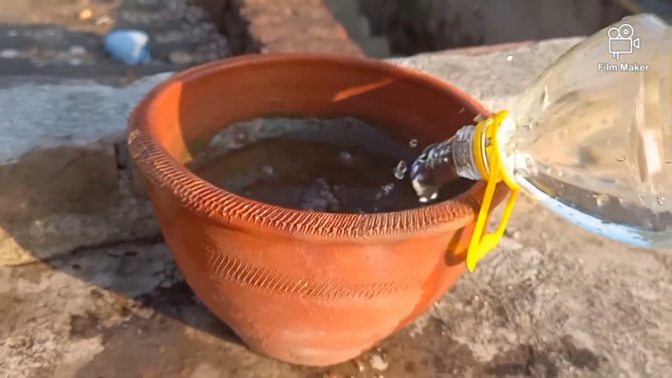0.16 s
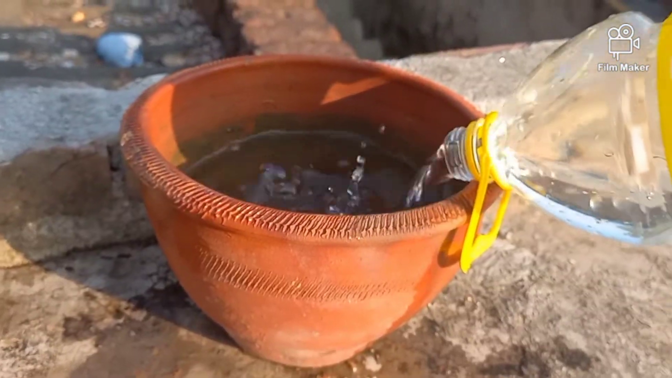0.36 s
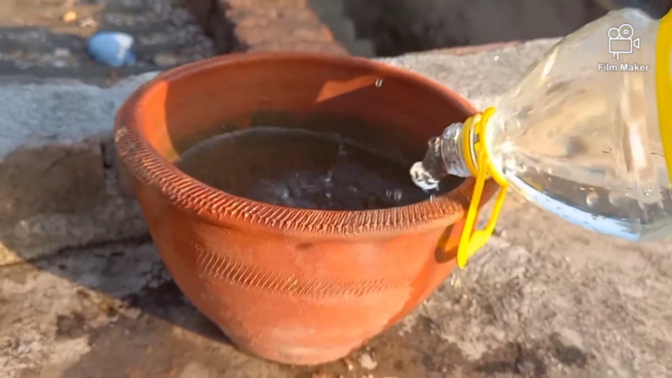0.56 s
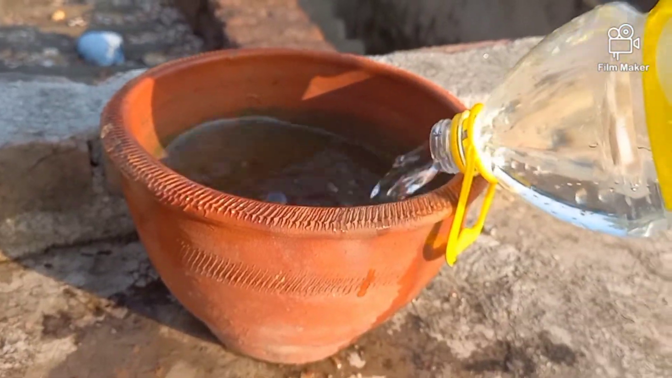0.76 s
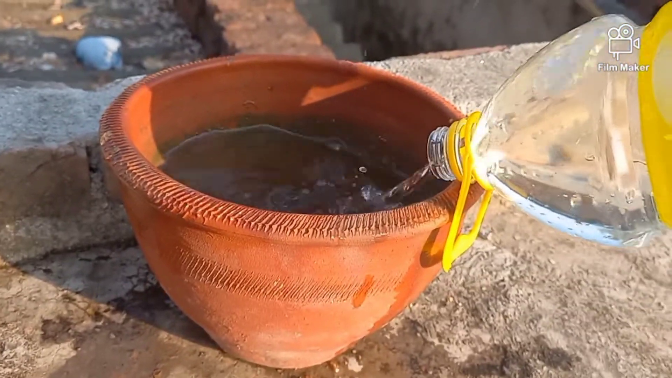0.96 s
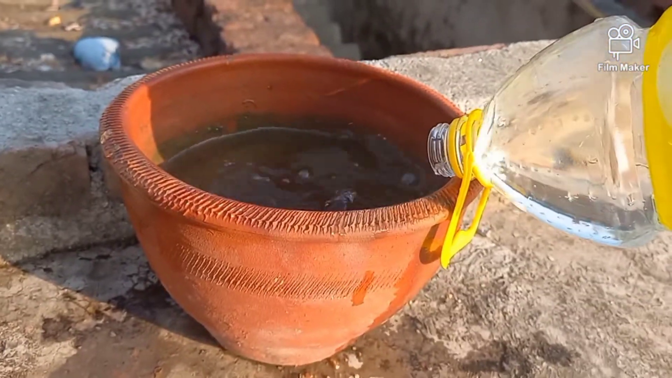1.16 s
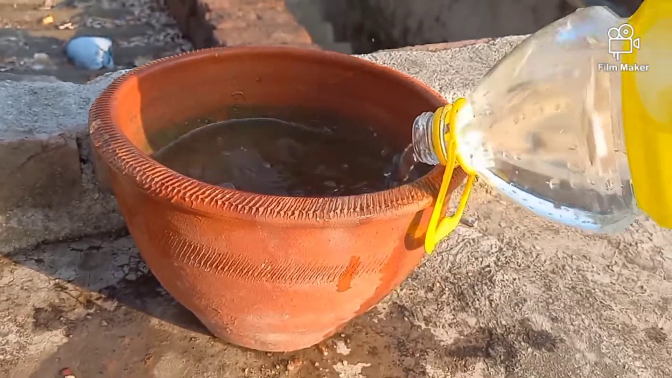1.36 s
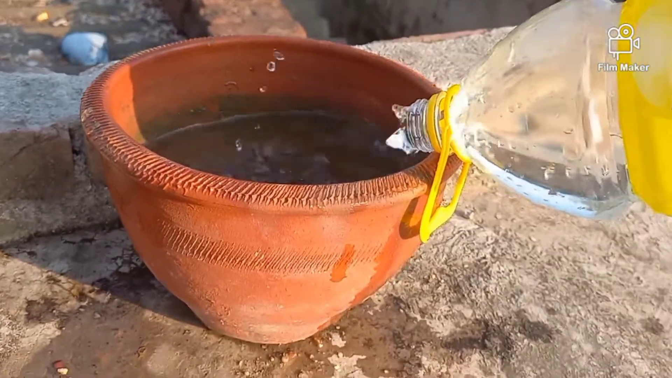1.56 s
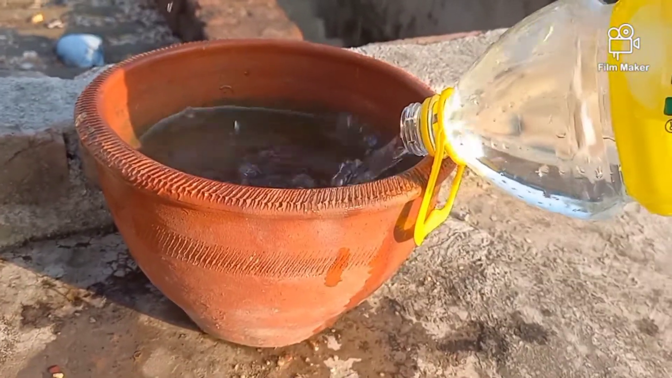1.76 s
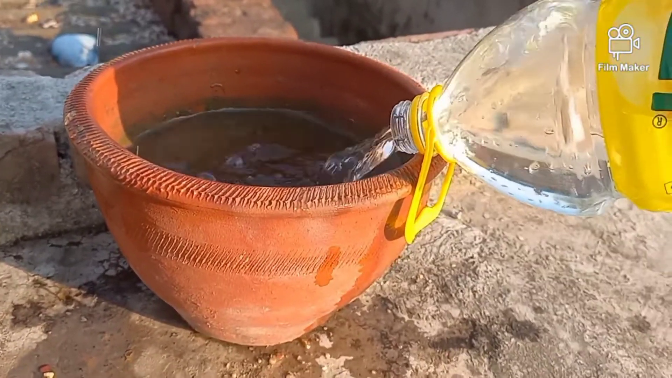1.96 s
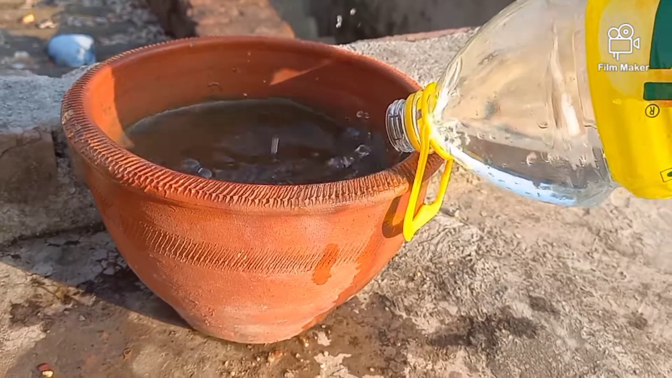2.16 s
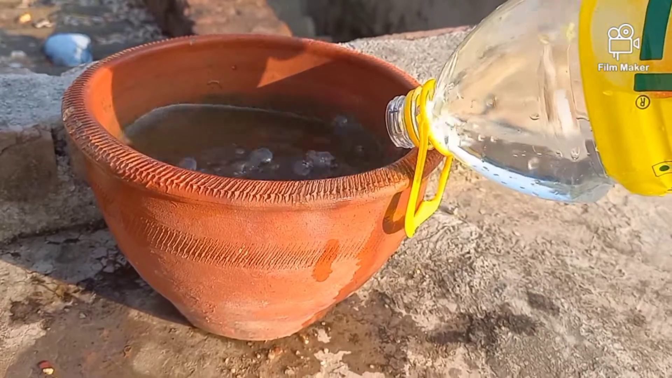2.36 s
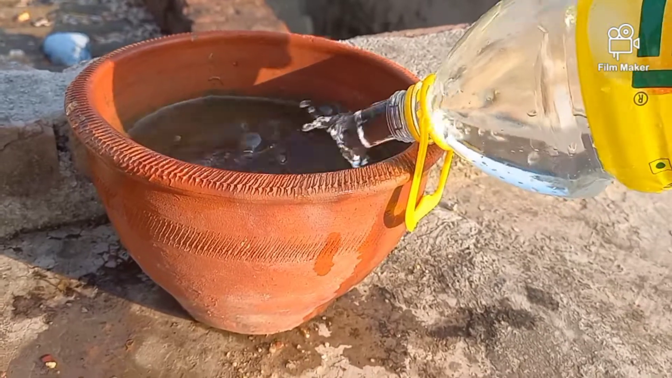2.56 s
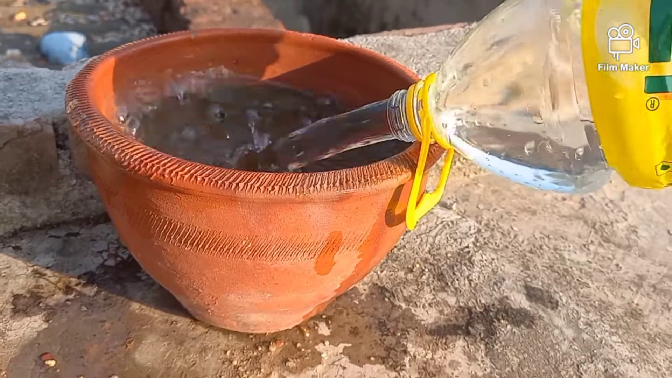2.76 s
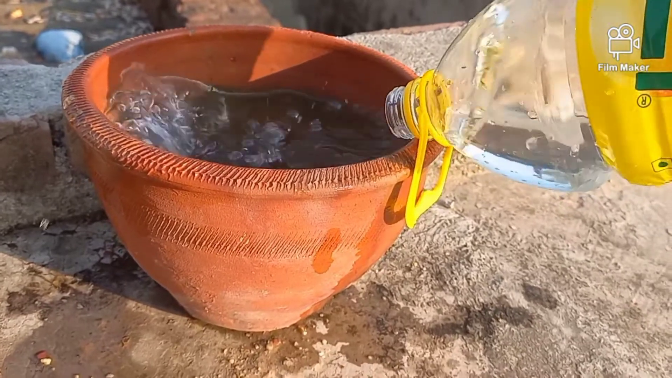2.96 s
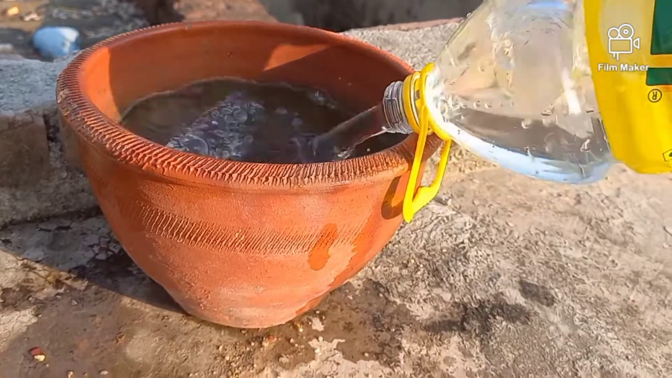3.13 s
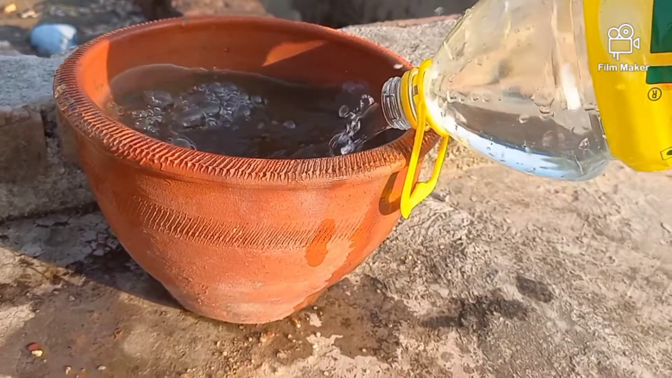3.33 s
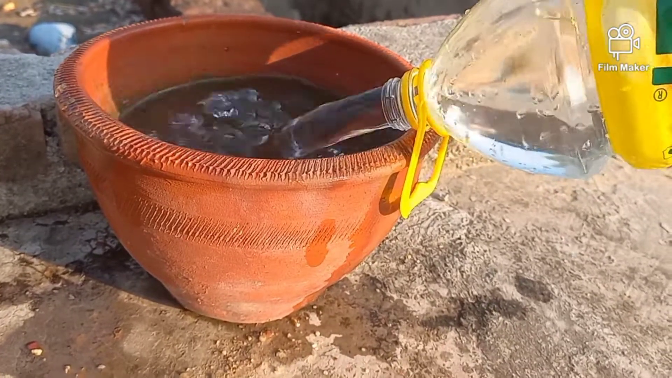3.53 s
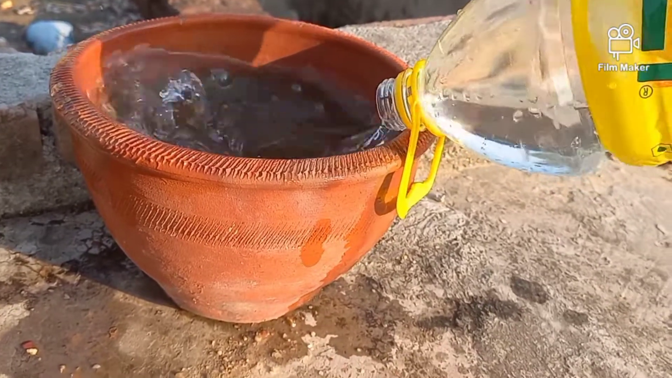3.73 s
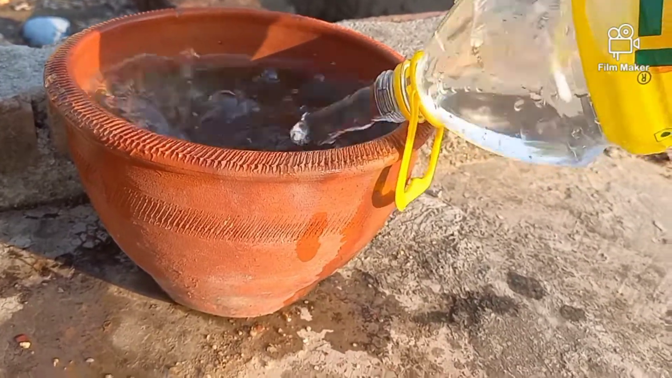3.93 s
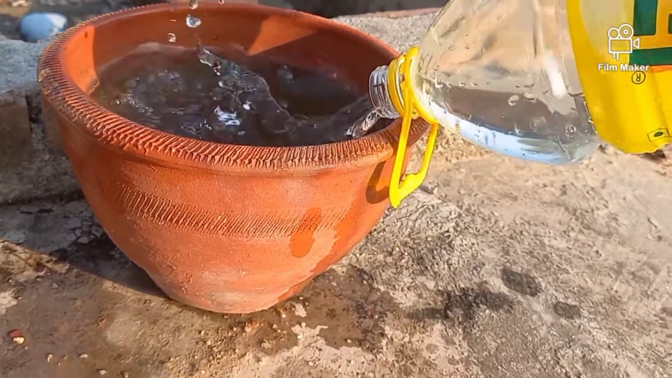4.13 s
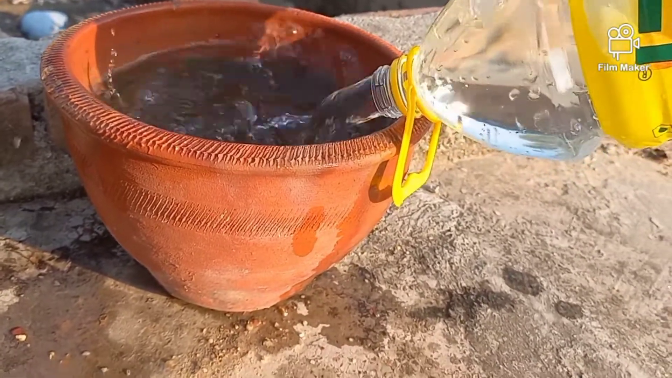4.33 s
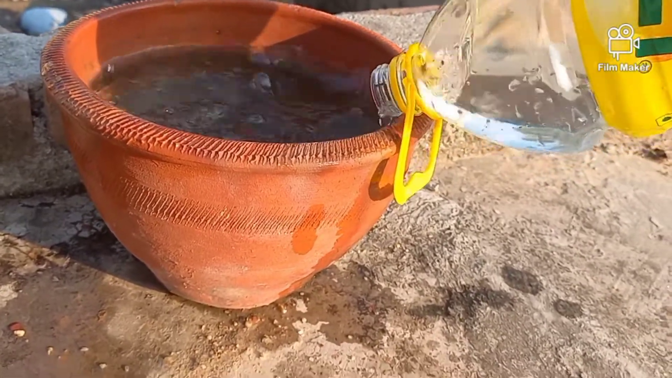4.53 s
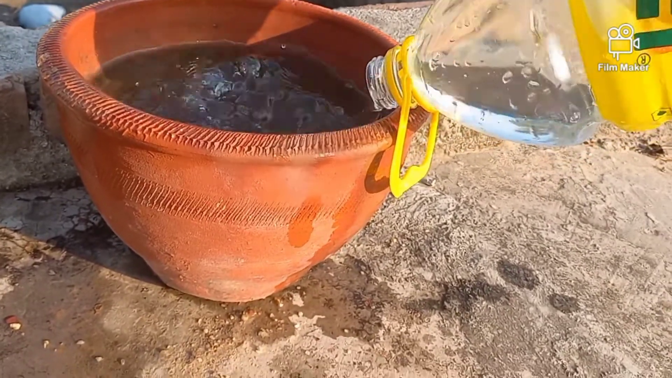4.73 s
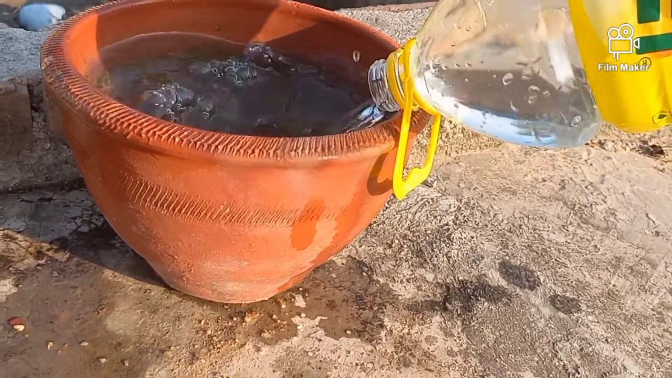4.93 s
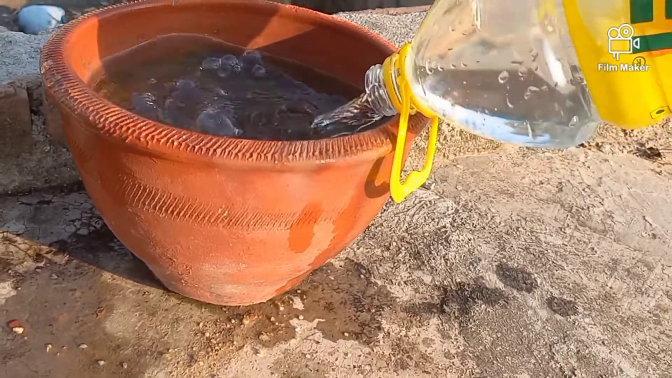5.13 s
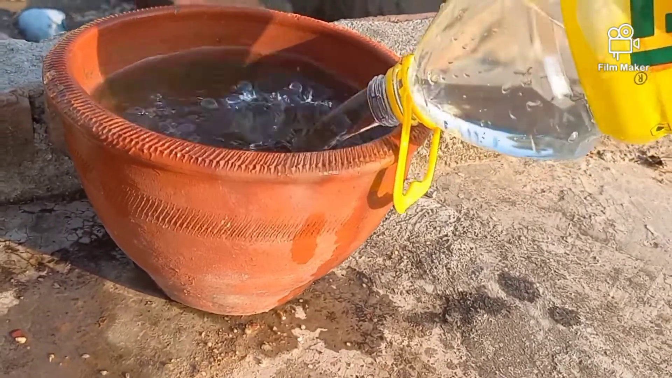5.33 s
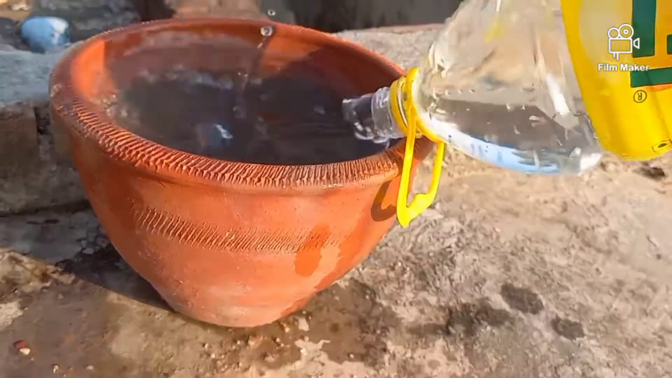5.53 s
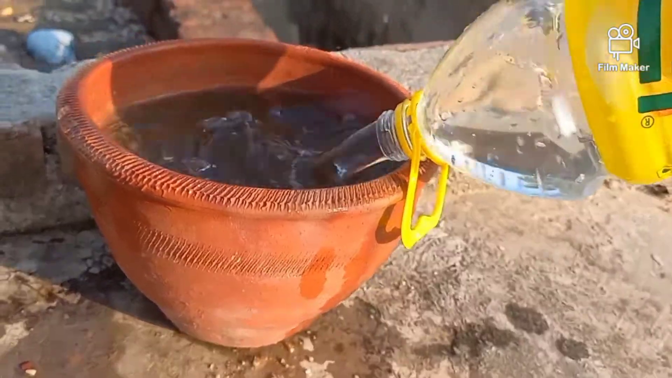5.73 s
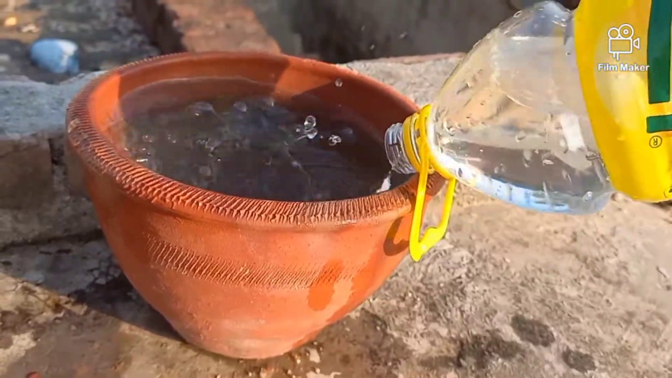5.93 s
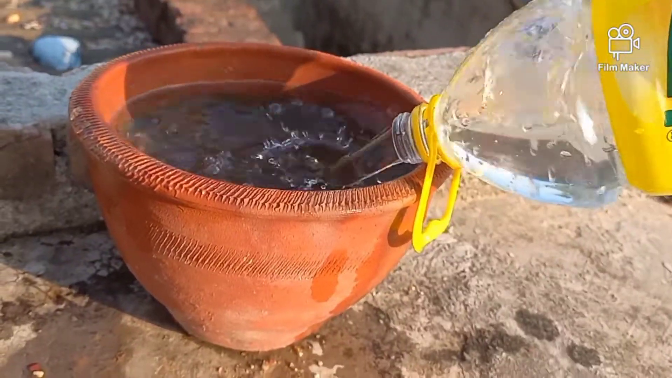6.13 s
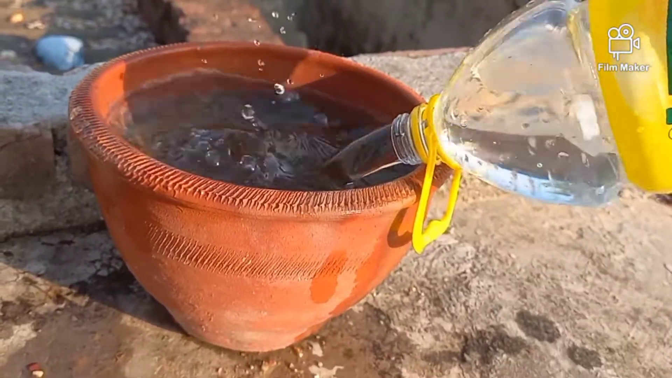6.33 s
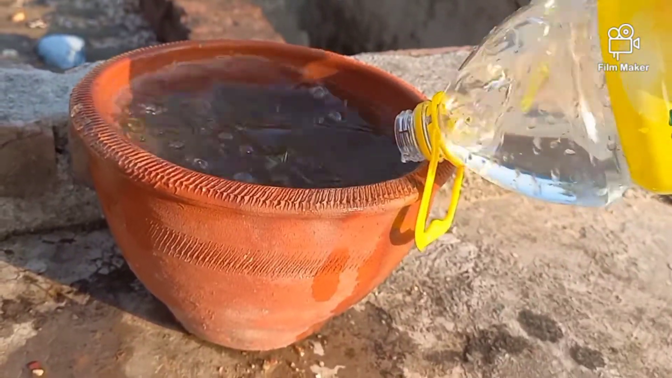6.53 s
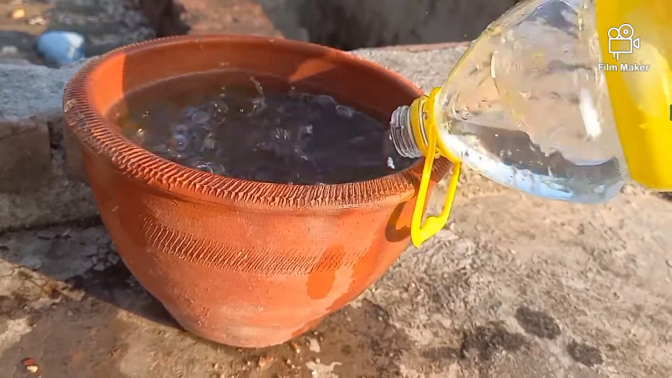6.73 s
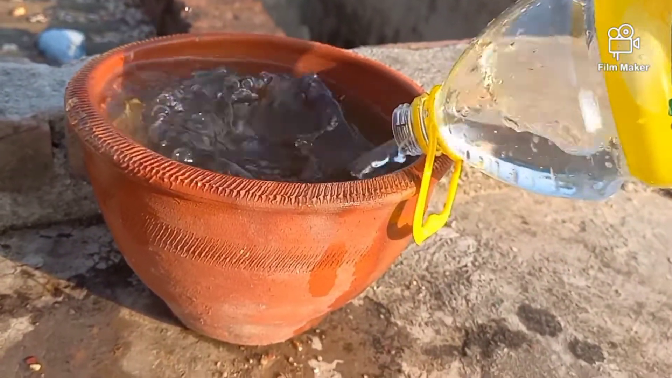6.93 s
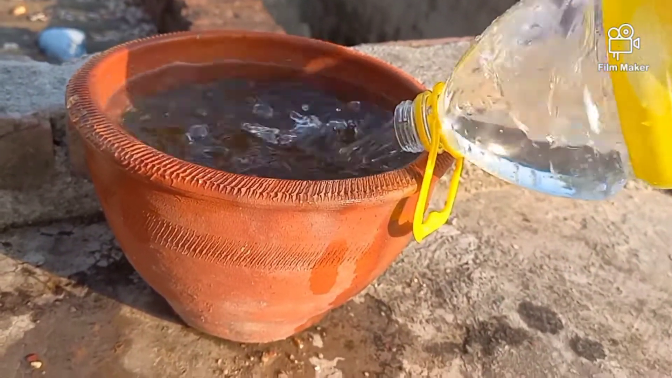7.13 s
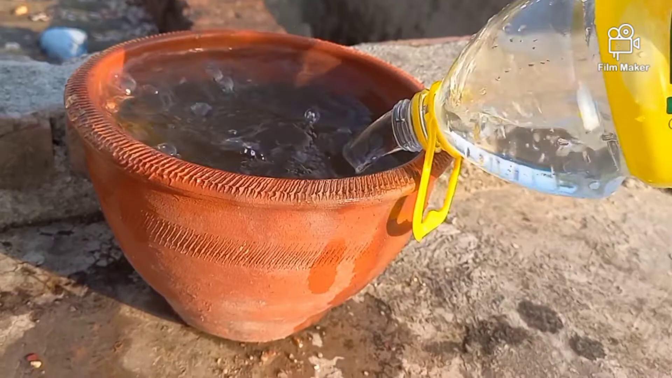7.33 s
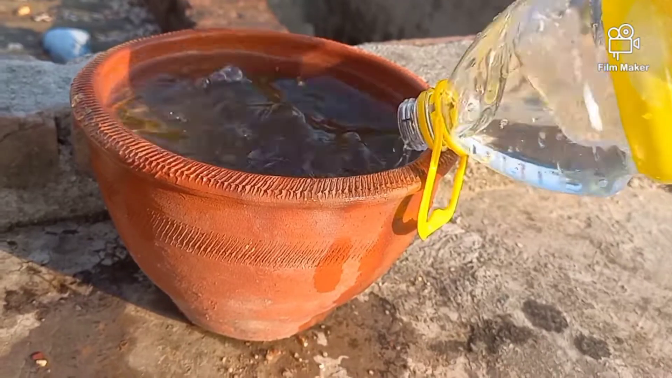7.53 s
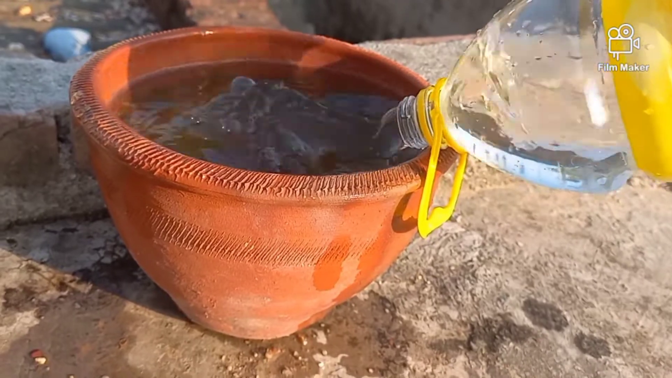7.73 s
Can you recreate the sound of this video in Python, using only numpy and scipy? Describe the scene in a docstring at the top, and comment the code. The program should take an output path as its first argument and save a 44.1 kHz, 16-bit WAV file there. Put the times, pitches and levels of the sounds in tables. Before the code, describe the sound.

Outdoors, close up, water leaves a large plastic bottle for a half-full clay bowl. From 0 to 2.5 s it only dribbles: small wet slaps, droplet patter and single round bubble plops, some low and hollow, some higher, with quieter gaps. At about 2.6 s the thin bottle wall begins to crackle and buckle, and from 2.7 to 3.1 s a strong gulp lands with low thumps, heavy splashing and a loud low bubble note. Another crack comes near 3.6 s and a big thumping splash at 3.8 s. Smaller glugs run through 4.3 to 5.6 s, with slosh and fizzing froth. Sharp plastic snaps stand out around 5.9, 6.35, 6.9 and 7.5 s among bubbling gulps and splashes, then a thinning wash. Faint low outdoor air and a short, faint yard reflection stay behind.

```python
"""Water is poured from a big plastic bottle into a half-full clay bowl, outdoors and close by.
It dribbles at first, each slap a patter of droplets and each trapped air pocket a damped ringing tone.
Then it comes in gulps: the thin wall buckles with cracks, and wall and plunging water thump low.
Each gulp stirs swarms of tiny bubbles into slosh, froth and spray, and leaves an afterwash.
The bowl's resonances colour the blows; a faint yard tail and outdoor air lie behind throughout."""
import sys
import numpy as np
from scipy import signal
from scipy.fft import rfft, irfft, next_fast_len
from scipy.io import wavfile
from scipy.ndimage import uniform_filter1d, map_coordinates

SR = 44100
rng = np.random.default_rng(int(sys.argv[2]) if len(sys.argv) > 2 else 0)


def master(y):
    """Save y as 16-bit WAV."""
    cut = np.clip(np.atleast_2d(y).T, -1, 1)
    pcm = np.round(cut * 32767)  # scale
    wavfile.write(sys.argv[1], SR, pcm.astype(np.int16))


N = 343098
BURST_TIME = np.arange(SR // 4) / SR  # s

# All levels in the tables are relative.
# Spectrum of the outdoor air: f/Hz, level/dB
AIR_SPECTRUM = [(12, -42), (20, -33), (77, 4), (127, 2.5), (198, -3), (434, -6), (660, -18), (849, -17),
                (1190, -25.5), (1610, -18), (2530, -26.5), (6180, -34), (8180, -41), (12400, -29.5),
                (16000, -34)]
# Left-right likeness of the outdoor air: f/Hz, likeness (0 to 1)
AIR_LIKENESS = [(30, 0.61), (120, 1), (400, 0.32), (1500, 0.15), (4000, 0.02)]
# Decay of the yard's tail: f/Hz, t60/s
YARD_DECAY = [(150, 0.33), (1500, 0.27), (12000, 0.18)]
# Spectrum of the churning water: f/Hz, level/dB
WATER_SPECTRUM = [(47, -22), (80, 6), (130, 3.5), (170, -4), (296, -7.5), (378, 3), (563, -7.5), (820, -6),
                  (1170, -21.5), (1560, -13), (2330, -22.5), (3470, -24.5), (6310, -27), (8050, -35),
                  (16000, -32)]
# The water between gulps never quite settles: t/s, level/dB
TRICKLE_LEVEL = [(0.0, -46.5), (0.37, -58.5), (0.69, -72.5), (1.41, -52.5), (1.62, -71), (2.51, -54.5),
                 (2.79, -42), (2.88, -38), (3.07, -52), (3.44, -53), (3.73, -37.5), (4.14, -57.5),
                 (4.53, -56.5), (5.48, -63), (6.52, -48.5), (6.61, -66), (6.76, -44.5), (7.78, -65)]
# Dribbles and gulps that churn the bowl: t/s (full level reached), hold/s, level/dB, frothiness/dB
GULP_EVENTS = [(0.037, 0.051, -41, -5.5), (0.124, 0.15, -42.5, -9.5), (0.496, 0.0067, -42.5, 9),
               (0.752, 0.037, -48.5, 1.5), (0.92, 0.084, -43.5, -1), (1.19, 0.072, -56, 9),
               (1.545, 0.083, -50.5, 1), (1.781, 0.0097, -45, -12), (1.928, 0.099, -45.5, -3.5),
               (2.123, 0.15, -44.5, -4.5), (2.408, .05, -47, 0), (2.615, 0.0078, -31, 2),
               (2.729, 0.038, -36, 1), (2.887, 0.013, -25, -18), (2.963, 0.1, -30.5, -10.5),
               (3.02, 0.024, -20.5, -4), (3.158, 0.035, -36, -20), (3.499, 0.0083, -37, 3.5),
               (3.586, 0.1, -37, -3.5), (3.828, .025, -21, -0.5), (3.904, 0.066, -38.5, -9),
               (4.359, 0.022, -42.5, -2.5), (4.548, 0.088, -33, -8), (4.843, 0.023, -41, -0.5),
               (5.042, 0.072, -29.5, -3), (5.311, .02, -40.5, 1.5), (5.486, 0.084, -28.5, -6.5),
               (5.747, 0.017, -39, -1.5), (5.907, 0.039, -39.5, -1.5), (6.045, 0.036, -28.5, -4.5),
               (6.285, 0.093, -46, 2), (6.527, 0.062, -25.5, -1.5), (6.892, .03, -38.5, 5),
               (7.043, 0.043, -33.5, 2), (7.266, 0.092, -49, -5.5), (7.475, 0.026, -39, 2),
               (7.588, 0.0077, -34, -13)]
# Bubble swarms: rate/(grains per s), lowest f/Hz, highest f/Hz, typical t60/cycles,
# fractional pitch rise over t60, size scatter/dB
SLOSH_SWARM = (200, 110, 650, 5.5, .15, 3.5)
FROTH_SWARM = (900, 650, 3500, 7, .1, 4.5)
SPRAY_SWARM = (1800, 3000, 16000, 9, .1, 5)
CHIRP_SWARM = (260, 600, 4200, 30, .25, 3.5)
DROPLET_SWARM = (3500, 1100, 16000, 9, .15, 4)
PLINK_SWARM = (70, 900, 4500, 45, .2, 4)  # drops falling back between gulps
# Single ringing bubbles: t/s, initial f/Hz, level/dB
BUBBLE_EVENTS = [(.0125, 1550, -22.5), (.0215, 345, -25), (.203, 1484, -39), (.219, 737, -39),
                 (.347, 1475, -34), (.3635, 372, -23), (.568, 794, -42), (.927, 471, -32),
                 (1.214, 1460, -38.5), (1.249, 1610, -37), (1.4615, 446, -26.5), (1.574, 820, -42),
                 (1.7795, 519, -31.5), (2.195, 835, -37.5), (2.218, 2420, -41.5), (2.429, 456, -36),
                 (3.052, 360.7, -14.5), (3.757, 915, -43), (3.868, 395, -17.5), (3.906, 436, -29),
                 (4.098, 503, -24), (4.209, 3270, -41.5), (4.448, 3370, -40.5), (4.497, 3380, -36.5),
                 (4.604, 772, -33), (4.954, 1570, -34.5), (5.01, 299, -29.5), (5.495, 345, -22.5),
                 (5.524, 740, -24), (5.7, 2510, -38), (5.754, 793, -31.5), (5.931, 466, -22.5),
                 (6.322, 1340, -37), (6.408, 535, -30), (6.976, 436, -23), (7.028, 417, -31),
                 (7.068, 707, -34)]
# Water slaps the surface: t/s, level/dB, brightness/dB
SPLAT_EVENTS = [(.0215, -46.5, 5), (.04, -52, 7), (.0886, -44, -10), (.1404, -47, 8), (.2495, -49, -9.5),
                (.3756, -44, -6), (.4958, -40, -6), (.7559, -48.5, 3), (.9528, -45, 0), (.9752, -43, -4),
                (1.0159, -43.5, -3), (1.0783, -47.5, 2.5), (1.1177, -44, -4), (1.197, -49, -12),
                (1.293, -50, -13), (1.391, -56, -5), (1.4617, -48, -10), (1.5737, -40, -9),
                (1.7797, -46.5, -6), (1.946, -48, -12), (1.9685, -51.5, -18), (2.1332, -42.5, -4.5),
                (2.2664, -49.5, -1), (2.4488, -52, -16), (2.4695, -51, -3), (2.5383, -42, -5),
                (3.0288, -24.5, -11), (3.0384, -24, -8.5), (3.4931, -42, -11), (3.5056, -46.5, 8),
                (3.6372, -43.5, -15), (3.8323, -22, -9.5), (3.8405, -22, -4.5), (4.0978, -47, 0),
                (4.545, -39, -2.5), (4.5607, -35, -0.5), (4.6136, -46, -11.5), (4.7141, -41.5, 2),
                (5.0113, -41.5, -9), (5.0535, -33, -1), (5.509, -31, -2.5), (5.5253, -38.5, -9),
                (5.8865, -40, -1), (6.0378, -38, -3), (6.047, -35.5, -4), (6.1189, -42, 1.5),
                (6.5478, -38, -13), (6.5605, -47, -16), (6.6734, -41, -3), (7.0649, -50, -12),
                (7.4661, -59, 1)]
# Low thumps, from plunging water or the bottle wall: t/s, initial f/Hz, level/dB
LOW_THUMP_EVENTS = [(0.2502, 360, -25.5), (0.976, 636, -34.5), (1.118, 710, -35.5), (1.7795, 530, -32.5),
                    (2.1329, 780, -41.5), (2.6197, 478, -21), (2.732, 202, -13), (2.8893, 510, -17.5),
                    (2.9022, 380, -9), (2.9488, 242, -24), (3.0021, 235, -11), (3.029, 510, -12),
                    (3.174, 235, -36), (3.4931, 950, -29.5), (3.5053, 153, -29), (3.6363, 266, -23),
                    (3.666, 219, -20.5), (3.8253, 840, -19), (3.8325, 437, -12), (3.839, 830, -15),
                    (4.3787, 149, -27.5), (4.5476, 270, -23), (4.5592, 336, -21), (4.6162, 293, -25.5),
                    (4.8663, 178, -27), (5.0437, 300, -19.5), (5.0733, 376, -20.5), (5.125, 226, -26.5),
                    (5.3158, 169, -31.5), (5.5004, 346, -25), (5.528, 350, -23), (5.5805, 189, -25),
                    (5.8859, 367, -27.5), (5.9001, 424, -25), (6.048, 600, -26), (6.0693, 290, -25.5),
                    (6.2416, 342, -20.5), (6.3417, 390, -26.5), (6.5337, 282, -21), (6.5632, 496, -19),
                    (6.7639, 314, -30.5), (7.053, 625, -25), (7.467, 335, -33), (7.4832, 446, -23.5),
                    (7.5932, 410, -34)]
# The bottle wall buckles: t/s, crack level/dB, brightness/dB, knock level/dB
CRACK_EVENTS = [(2.606, -41.5, 0, -47), (2.6173, -34, 10, -41), (2.6327, -40, 9, -51),
                (2.6581, -40, -2.5, -45), (2.694, -48, 19, -43), (2.7137, -41, 3, -50),
                (2.7342, -35, 4, -21), (2.779, -24.5, 1.5, -23), (2.8084, -32.5, 5.5, -11.5),
                (2.8573, -31.5, 2.5, -9.5), (2.888, -48, 7, -45), (2.901, -42, 14, -41),
                (2.914, -52, 19.5, -59), (2.948, -30, 5, -27), (3.0011, -38, 3, -12),
                (3.2855, -43, 5.5, -40.5), (3.579, -45, 16, -58), (3.5926, -24, 2, -19.5),
                (3.6369, -44, 3, -25), (3.7118, -31, 6, -16.5), (4.3292, -42, 1, -28.5),
                (4.3706, -40.5, 7, -57), (4.411, -47, 7, -66), (4.811, -43, 2.5, -37.5),
                (4.8857, -43, 11, -46), (5.3144, -40.5, 4, -34.5), (5.36, -39, 6.5, -44),
                (5.58, -38, -2, -48), (5.7297, -41.5, 5, -39), (5.7813, -39.5, 10.5, -54),
                (5.7892, -40, 1.5, -59), (5.898, -22.5, -0.5, -20), (6.2399, -41.5, 9, -27),
                (6.287, -38, 1.5, -58), (6.301, -40.5, 6.5, -54), (6.3133, -38, 5, -54),
                (6.3505, -22, 0, -22), (6.393, -36.5, 10, -31), (6.397, -41.5, -3, -16),
                (6.534, -39.5, 5.5, -12.5), (6.7636, -46, 4, -44), (6.844, -41.5, 9, -47),
                (6.897, -38, 12, -39), (6.904, -23, 0, -25), (7.0433, -28.5, 2.5, -35),
                (7.267, -47, 1, -61), (7.311, -45, 7, -48), (7.3513, -44.5, 0, -62), (7.3792, -45, -1, -49),
                (7.4811, -22.5, -1.5, -23), (7.593, -31.5, -4.5, -25.5), (7.7527, -47, 4, -39.5)]
# Treble bands of a hit: lower f/Hz, upper f/Hz
TREBLE_BANDS = [(1200, 2600), (2600, 7500), (7500, 16000)]
# Level of each treble band, low to high: level/dB
SPLAT_BAND_LEVELS = [-2, 0.5, 0.5]
CRACK_BAND_LEVELS = [-1.5, 2.06, -2.5]
# Resonances of the plastic shell: f/Hz, width/Hz, level/dB
SHELL_MODES = [(1760, 160, -17), (2920, 450, -4.5), (4150, 650, 1), (5240, 61, 1.5), (5750, 960, -5.5),
               (7250, 400, -2), (9800, 4800, -14), (12400, 380, 0.5), (14800, 810, -6)]
# Resonances of the air in the bowl: f/Hz, width/Hz, level/dB
BOWL_MODES = [(149, 27, -33), (270, 94, 1), (407, 9.6, -26), (427, 28, 8), (928, 580, 1.5), (1013, 76, 4.5),
              (1560, 100, -6.5), (1745, 160, 0.5), (4230, 330, -14)]
# The bottle lies to the right, so its treble is shaded on the left: f/Hz, left level/dB
LEFT_SHADE = [(300, -46), (2000, 5), (4000, -5), (8000, -5.5), (15000, -11)]

GULP_ATTACK_S, GULP_T60_S = 0.0074, 0.12
AFTERWASH_DB, AFTERWASH_T60_S = -17, 0.45
FROTH_DB, SPRAY_DB = -9.5, -28.5  # where the foam level stands at 0 dB
PLINK_DB = -31.5  # where the trickle stands at 0 dB
SPRAY_GROWTH, PLINK_GROWTH = 0.6, 0.5  # dB of spray per dB of foam, dB of plinks per dB of trickle
EBB_DB, EBB_RATE = 2, 7  # the spray also ebbs slowly: depth, random knots per second
BUBBLE_T60_S, BUBBLE_REF_HZ, BUBBLE_SHORTENING = 0.1, 398, 0.43  # higher bubbles die sooner
BUBBLE_OVERTONE_DB = -16.5  # a bubble that is not quite round also sounds its octave
LOW_KNOCK_RATIO, LOW_KNOCK_DB = 2.09, -10.5  # pitch and level of a low thump's knock against its push
WALL_KNOCK_HZ, WALL_PUSH_HZ, WALL_PUSH_DB = 862, 295, -6.5  # push level against the knock
KNOCK_OVERTONE_RATIO, KNOCK_OVERTONE_DB = 2.15, -11  # the knock's next mode
FAINT_LEAD_S, FAINT_DB = 0.006, -21  # a faint, like burst sounds 6 ms before each crack
TOP_HZ = 16000


def amp(db):
    """Logarithmic level: decibels to amplitude ratio."""
    return 10 ** (np.asarray(db) / 20)


def unit(x):
    """Normalisation by power: x at rms 1."""
    return x / np.sqrt(np.mean(x ** 2) + 1e-20)


def blow(x):
    """Normalisation by energy: that of a hundredth of a second at rms 1."""
    return x / np.sqrt(np.sum(x ** 2) * 100 / SR + 1e-20)


def along(points, hz):
    """Logarithmic frequency scale: interpolate (f, value) points along it."""
    f, values = np.transpose(points)
    return np.interp(np.log(hz + 1), np.log(f + 1), values)


def wobble(rate):
    """Slow random fluctuation: a smooth curve through rate random knots per second."""
    knots = rng.standard_normal(int(N * rate / SR) + 4)
    return map_coordinates(knots, [np.arange(N) * rate / SR])


def filtered(x, response):
    """Linear filtering: multiply the spectrum by a complex response of frequency."""
    n = x.shape[-1]
    padded = next_fast_len(n + 4096)
    spectrum = rfft(x, padded) * response(np.fft.rfftfreq(padded, 1 / SR))
    return irfft(spectrum, padded)[..., :n]


def band(x, lo, hi, order=3):
    """Causal band-pass filtering."""
    sos = signal.butter(order, [lo, min(hi, SR / 2 - 100)], "band", fs=SR, output="sos")
    return signal.sosfilt(sos, x)


def resonate(x, modes):
    """Modal superposition: parallel second-order resonances of alternating sign."""
    def response(f):
        total = 0
        for k, (centre, width, db) in enumerate(modes):
            damping = 1j * f * width
            total = total + (-1) ** k * amp(db) * damping / (centre ** 2 - f ** 2 + damping)
        return total
    return filtered(x, response)


def add(track, s, x):
    """Superposition: mix x into the track at time s."""
    i = max(round(s * SR), 0)
    track[..., i:i + x.shape[-1]] += x[..., :max(N - i, 0)]


def place(pair, lag):
    """Interchannel time difference: the left channel trails the right by lag samples."""
    sides = np.array([[-1], [1]])
    return filtered(pair, lambda f: np.exp(1j * np.pi * f / SR * lag * sides))


def spread(noises, alike):
    """Interchannel coherence: two unrelated signals become a left and a right of the given likeness."""
    turn = np.arccos(np.clip(alike, 0, 1)) / 2
    mid, side = np.cos(turn) * noises[0], np.sin(turn) * noises[1]
    return np.array([mid + side, mid - side])


def ring(t, hz, t60, rise, attack):
    """Damped oscillation: a tone swells and decays exponentially while its pitch glides by rise over t60."""
    tone = np.sin(2 * np.pi * hz * t * (1 + rise * t / t60 / 2))
    return tone * amp(-60 * t / t60) * (1 - np.exp(-t / attack))


def strike(table, bursts, band_levels):
    """Spectral tilt: one stereo burst per row, brightness tilting three treble bands about the middle one."""
    out = np.zeros((2, N))
    for k, (lo, hi) in enumerate(TREBLE_BANDS):
        part = band(bursts, lo, hi)
        for i, (s, db, bright_db, *_) in enumerate(table):
            add(out, s, amp(db + band_levels[k] + (k - 1) * bright_db) * blow(part[:, i]))
    return out


def air():
    """Shaped random noise: distant outdoor rumble and a thin hiss, less alike left and right in the treble."""
    noise = rng.standard_normal((2, N))

    def response(f):
        turn = np.arccos(np.clip(along(AIR_LIKENESS, f), 0, 1)) / 2
        return amp(along(AIR_SPECTRUM, f)) * [np.cos(turn), np.sin(turn)]
    mid, side = filtered(noise, response)
    return amp(-50 + 0.53 * wobble(12)) * unit(np.array([mid + side, mid - side]))


def yard(x):
    """Diffuse reverberation: ground and low walls return a short tail that decays by frequency."""
    hz, t, noise = signal.stft(rng.standard_normal((2, SR // 3)), SR, nperseg=256)
    decay = amp(-60 * t / along(YARD_DECAY, hz)[:, None])
    tail = signal.istft(noise * decay, SR, nperseg=256)[1]
    return signal.fftconvolve(x, tail / np.linalg.norm(tail[0]), axes=1)[:, :N]


def flow():
    """Addition of powers: trickle, water and foam in dB; gulps swell, hold, die and leave an afterwash."""
    t = np.arange(N) / SR
    trickle_db = np.interp(t, *np.transpose(TRICKLE_LEVEL)) - 3
    water, foam = amp(trickle_db) ** 2, amp(trickle_db) ** 2
    age = t[:SR]
    for s, hold, db, frothy_db in GULP_EVENTS:
        after = np.maximum(age - GULP_ATTACK_S - hold, 0)
        release = amp(-60 * after / GULP_T60_S) + amp(AFTERWASH_DB - 60 * after / AFTERWASH_T60_S)
        power = (amp(db - 0.5) * np.minimum(age / GULP_ATTACK_S, 1) * release) ** 2
        add(water, s - GULP_ATTACK_S, power)
        add(foam, s - GULP_ATTACK_S, power * amp(frothy_db) ** 2)
    return trickle_db, 10 * np.log10(water), 10 * np.log10(foam)


def cloud(swarm, hiss, size):
    """Incoherent summation: small bubbles scattered over the surface, on a little noise, at even strength."""
    rate, lo_hz, hi_hz, cycles, rise, scatter_db = swarm
    when, pitch, life, strength, side, path, swing = rng.random((7, int(rate * N / SR), 1))
    hz = lo_hz * (hi_hz / lo_hz) ** pitch
    k = np.arange(size)  # samples of one grain
    t60 = cycles * (.5 + life) / hz
    grains = ring(k / SR, hz, t60, rise, t60 / 20) * (1 - k / size)
    grains *= amp(-scatter_db * np.log(.03 + strength)) * hz / lo_hz
    grains *= np.sign(swing - .5)  # random polarity
    pair = []
    for sign in (1, -1):
        start = (when * N + (1 + sign * (2 * path - 1)) * 8).astype(int)
        panned = grains * amp(sign * 4.2 * (side - 0.63))
        pair.append(np.bincount((start + k).ravel(), panned.ravel(), N)[:N])
    pair = unit(np.array(pair)) + hiss * unit(spread(rng.standard_normal((2, N)), 0.12))
    pair = band(pair, 0.73 * lo_hz, 1.1 * hi_hz, order=2)
    pair = filtered(pair, lambda f: amp(along(WATER_SPECTRUM, f)))
    # divide by the rms over a twentieth of a second
    power = np.abs(uniform_filter1d(np.mean(pair ** 2, 0), SR // 20))
    return pair / np.sqrt(power + 1e-20)


def churn():
    """Amplitude modulation by the flow: slosh, froth and spray in quick clusters; chirps and stray plinks."""
    trickle_db, water_db, foam_db = flow()
    clusters_db = 5 * wobble(130)
    swells_db = 3 * wobble(35) + EBB_DB * wobble(EBB_RATE)
    slosh = amp(water_db - 3) * cloud(SLOSH_SWARM, hiss=0.13, size=1900)
    fizz = amp(-0.5) * cloud(FROTH_SWARM, hiss=0.13, size=400)
    chirps = amp(1.5) * cloud(CHIRP_SWARM, hiss=0, size=1800)
    froth = amp(foam_db + FROTH_DB + clusters_db) * (fizz + chirps)
    spray_db = SPRAY_GROWTH * foam_db + SPRAY_DB + clusters_db + swells_db
    spray = amp(spray_db) * cloud(SPRAY_SWARM, hiss=0.95, size=170)
    plink_db = PLINK_GROWTH * trickle_db + PLINK_DB + 2.5 * wobble(36)
    plinks = amp(plink_db) * cloud(PLINK_SWARM, hiss=0.052, size=2000)
    return slosh + froth + spray + plinks


def bubbles():
    """Volume pulsation: pinched-off air pockets ring unsteadily; the smaller ones waver most."""
    out = np.zeros(N)
    for s, hz, db in BUBBLE_EVENTS:
        t60 = BUBBLE_T60_S * (BUBBLE_REF_HZ / hz) ** BUBBLE_SHORTENING
        waver = unit(band(rng.standard_normal(len(BURST_TIME)), 30, 330))
        t = BURST_TIME + 3e-5 * waver
        note = ring(t, hz, t60, rise=.2, attack=.9 / hz)
        octave = ring(t, 2 * hz, t60 / 2, rise=.1, attack=.45 / hz)
        add(out, s, amp(db + 4) * (note + amp(BUBBLE_OVERTONE_DB) * octave))
    out *= amp(1.5 * wobble(140))
    return place(np.array([out, out]), lag=4.7)


def splats(t60=0.034, wash_db=-17, wash_t60=0.069):
    """Two-stage decay: each slap is a quick, uneven patter of ringing droplets with a frothy wash."""
    t = BURST_TIME[:SR // 8]
    count = len(SPLAT_EVENTS)
    droplets = cloud(DROPLET_SWARM, hiss=0.48, size=350)[:, :count * len(t)]
    droplets = droplets.reshape(2, count, len(t))
    patter = unit(uniform_filter1d(rng.standard_normal((count, len(t))), size=45, axis=1))
    fade = amp(-60 * t / t60) + amp(wash_db - 60 * t / wash_t60)
    bursts = droplets * amp(1.5 * patter) * fade
    return place(strike(SPLAT_EVENTS, bursts, SPLAT_BAND_LEVELS), lag=-1.3)


def thump(knock_hz, knock_db, push_hz, push_db):
    """Heavily damped modes: a knock and its overtone ride on a slower push of air and water."""
    upper_hz = KNOCK_OVERTONE_RATIO * knock_hz
    # each t60 is a number of cycles over the pitch
    knock = blow(ring(BURST_TIME, knock_hz, 7 / knock_hz, 0.19, 0.5 / knock_hz))
    overtone = blow(ring(BURST_TIME, upper_hz, 15 / upper_hz, 0, 1 / upper_hz))
    push = blow(ring(BURST_TIME, push_hz, 3.66 / push_hz, -0.062, 0.5 / push_hz))
    return amp(knock_db - 6.5) * (knock + amp(KNOCK_OVERTONE_DB) * overtone) - amp(push_db - 6) * push


def thumps():
    """Impulsive excitation: each crack thumps at one wall pitch, the other thumps each at their own pitch."""
    out = np.zeros(N)
    for s, _, _, db in CRACK_EVENTS:
        add(out, s, thump(WALL_KNOCK_HZ, db, WALL_PUSH_HZ, db + WALL_PUSH_DB))
    for s, hz, db in LOW_THUMP_EVENTS:
        add(out, s, thump(hz * LOW_KNOCK_RATIO, db + LOW_KNOCK_DB, hz, db))
    # so small a source radiates no deep bass
    return place(band(out, 78, 4600, order=2) * amp([[-1.5], [1.2]]), lag=7.4)


def bottle(snap_t60=0.017, tail_t60=0.018, tail_db=-24, attack=0.00039):
    """Modal excitation: each crack of the buckling wall is a short noise burst through the shell's modes."""
    t = BURST_TIME[:SR // 12]
    decay = amp(-60 * t / snap_t60) + amp(tail_db - 60 * t / tail_t60)
    shape = decay * (1 - np.exp(-t / attack))
    cracks = list(CRACK_EVENTS)
    for s, db, bright_db, _ in CRACK_EVENTS:
        cracks.append((s - FAINT_LEAD_S, db + FAINT_DB, bright_db))
    noises = rng.standard_normal((len(cracks), 2, len(t))).swapaxes(0, 1)
    bursts = spread(noises, 0.36) * shape
    pair = strike(cracks, resonate(bursts, SHELL_MODES) + 0.16 * bursts, CRACK_BAND_LEVELS)
    pair = filtered(pair, lambda f: amp([along(LEFT_SHADE, f), 0 * f]))
    return amp(4.5) * place(pair, lag=7.28)


def scene():
    """Cavity resonance: blows ring on in the bowl's hollow, left of the bottle; all spreads into the yard."""
    blows = bottle() + splats() + thumps()
    delayed = np.pad(resonate(blows, BOWL_MODES), ((0, 0), (SR // 400, 0)))[:, :N]
    hollow = place(delayed, lag=-14.5)
    near = blows + amp(-8) * hollow + bubbles() + churn()
    return near + amp(-19.5) * yard(near) + air()


def record(dry):
    """Soft saturation and band limiting: the highest peaks are rounded, then a steep low-pass follows."""
    held = dry / (1 + np.abs(dry) ** 6) ** (1 / 6)
    return filtered(held, lambda f: 1 / (1 + (f / TOP_HZ) ** 120))


dry = scene()
out = record(dry)
master(out)
```